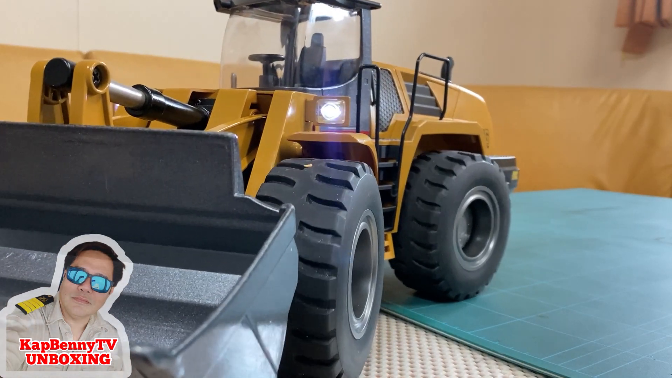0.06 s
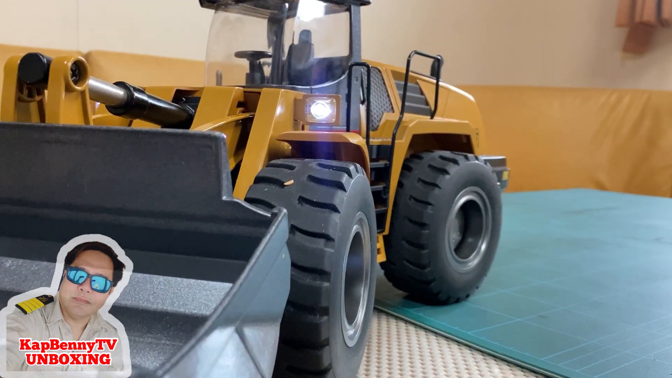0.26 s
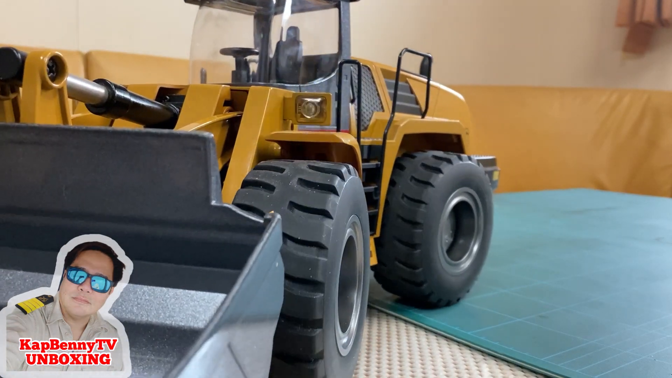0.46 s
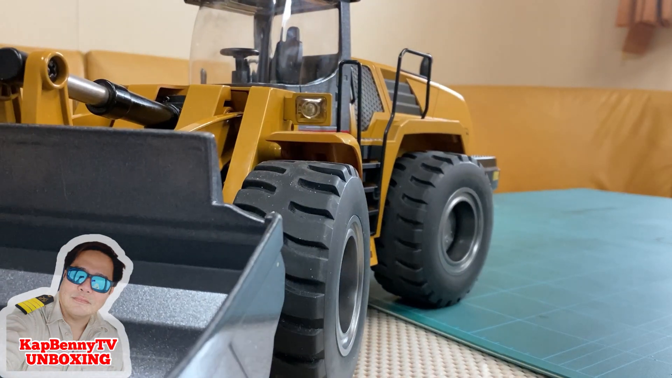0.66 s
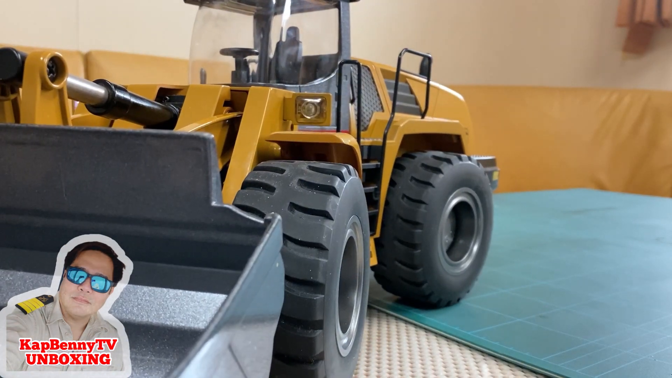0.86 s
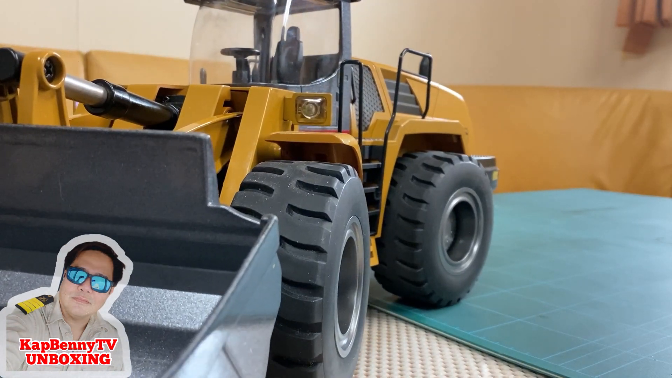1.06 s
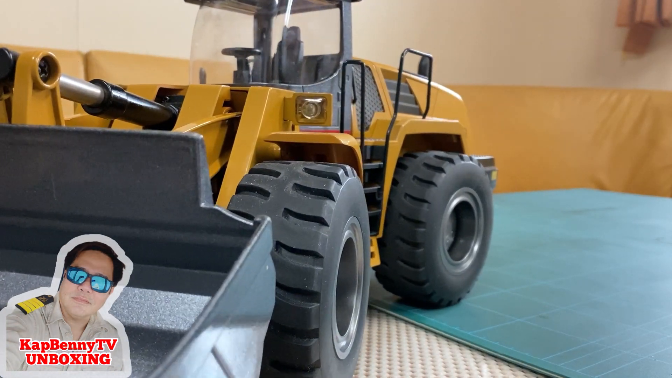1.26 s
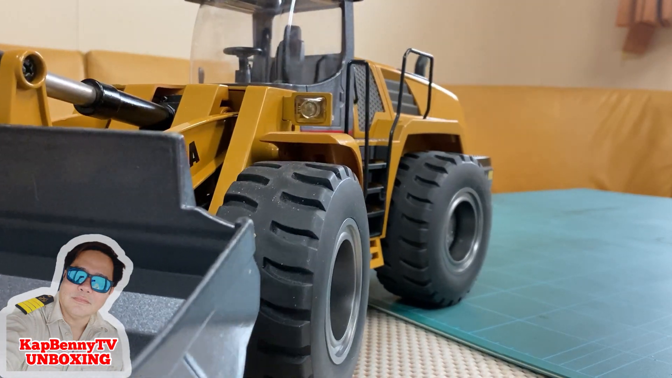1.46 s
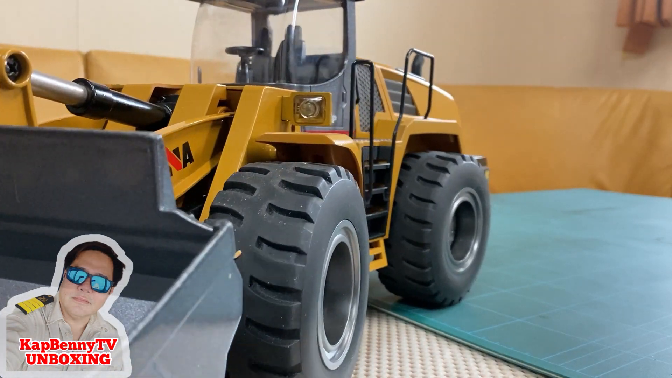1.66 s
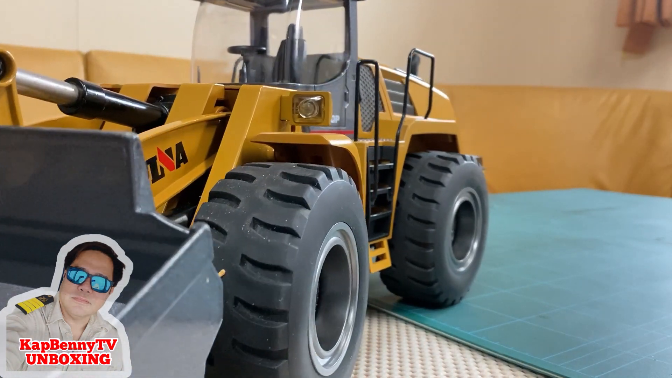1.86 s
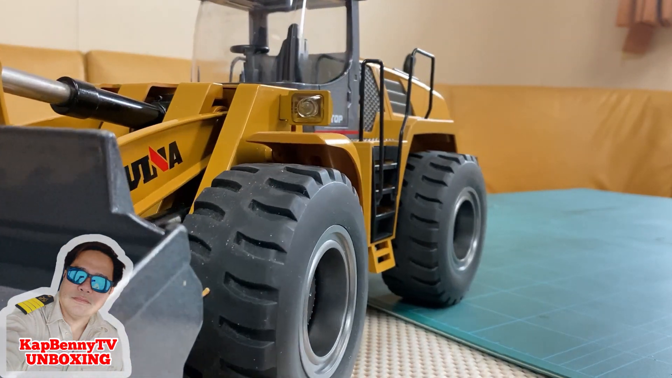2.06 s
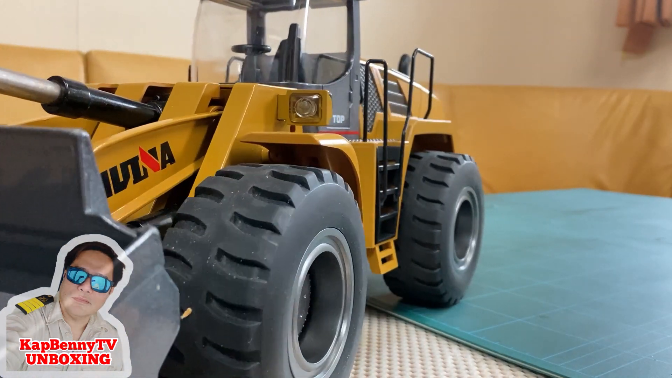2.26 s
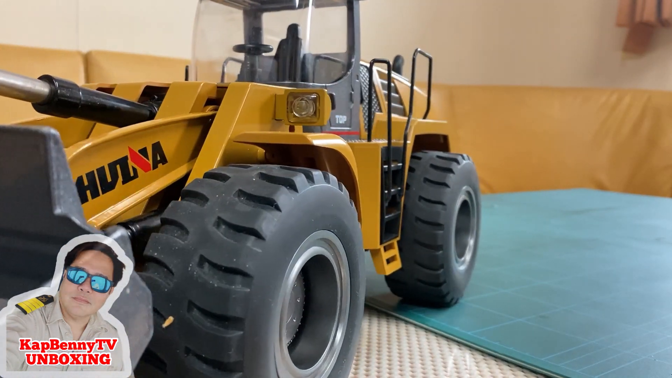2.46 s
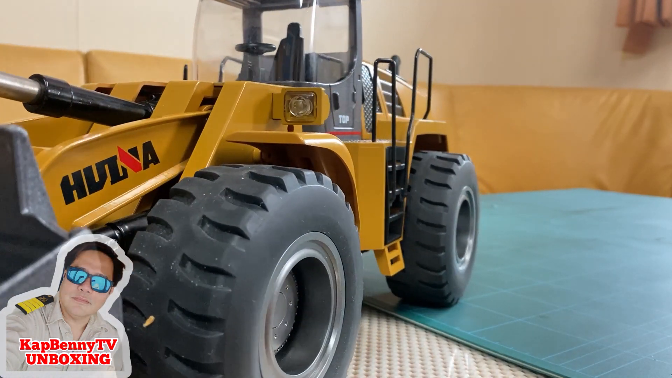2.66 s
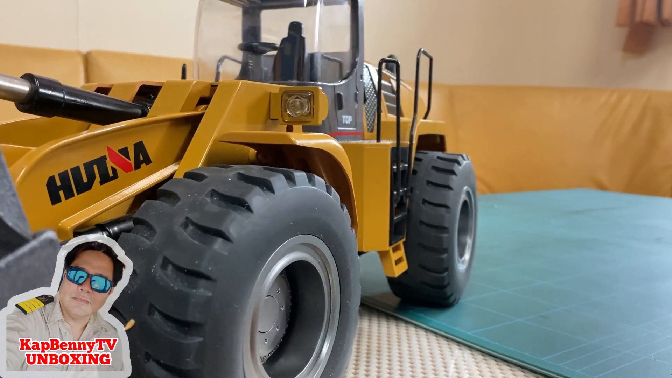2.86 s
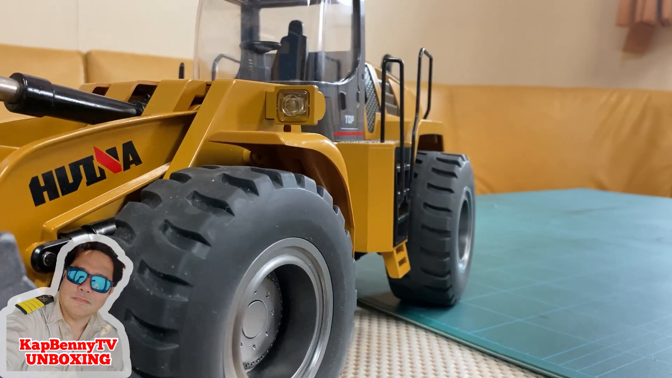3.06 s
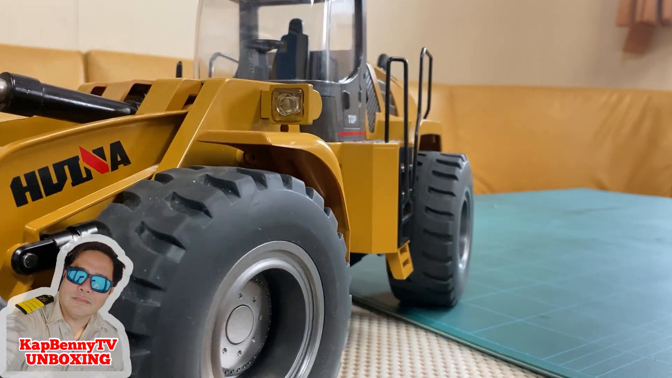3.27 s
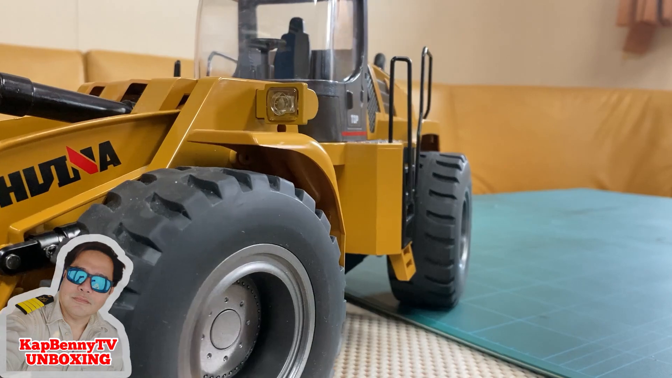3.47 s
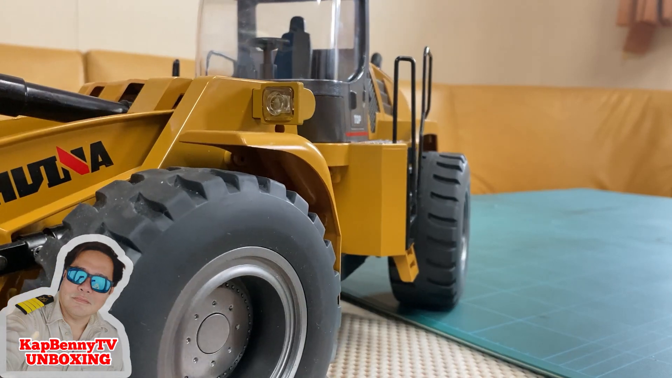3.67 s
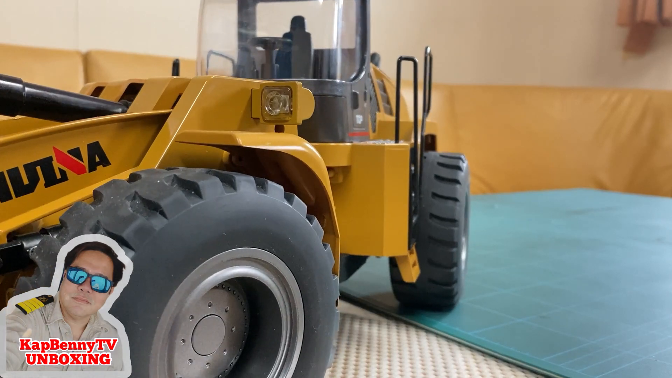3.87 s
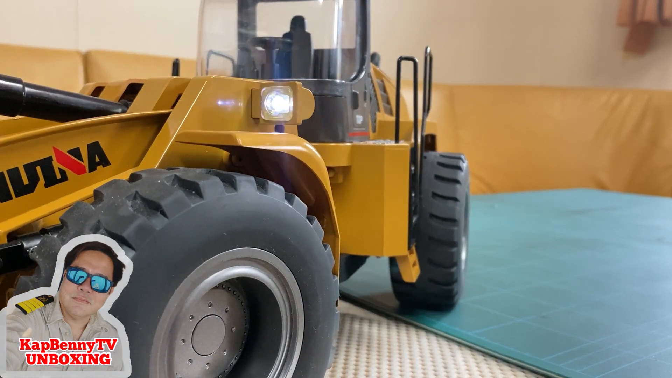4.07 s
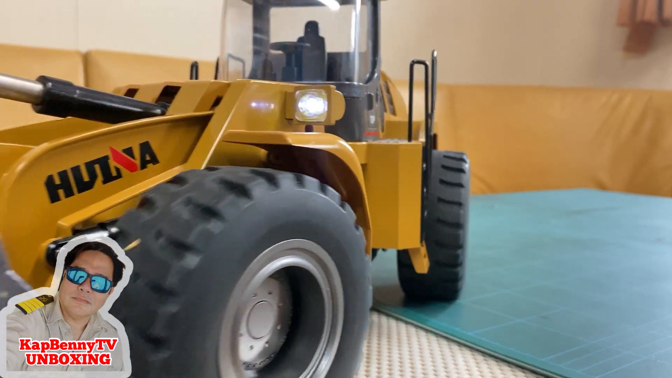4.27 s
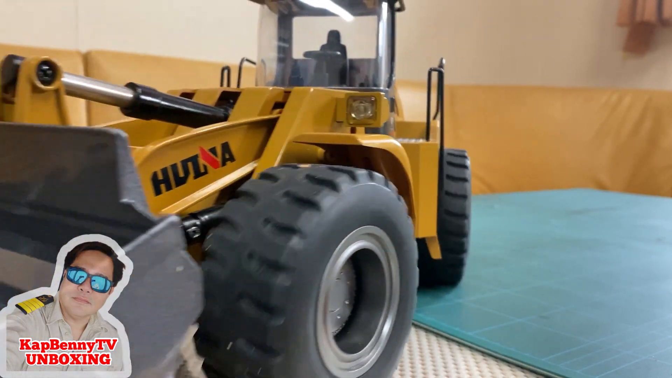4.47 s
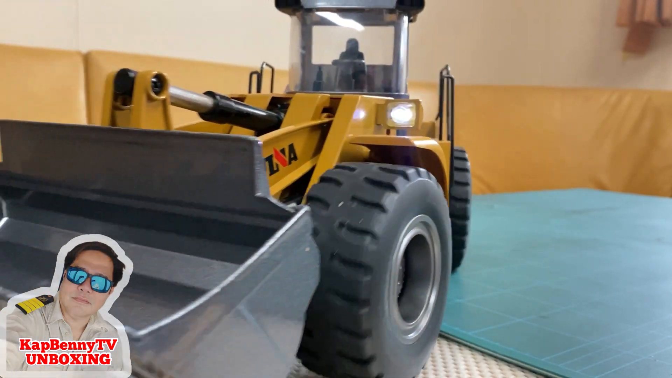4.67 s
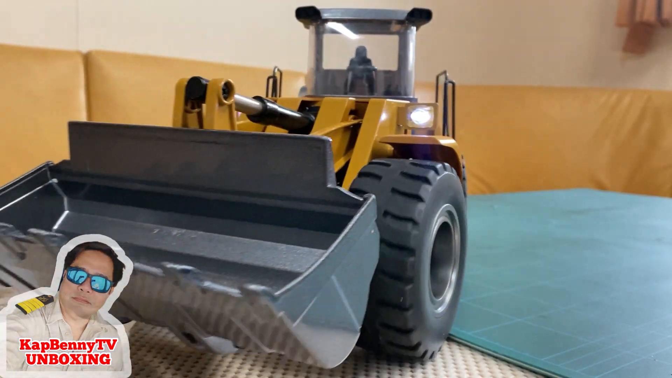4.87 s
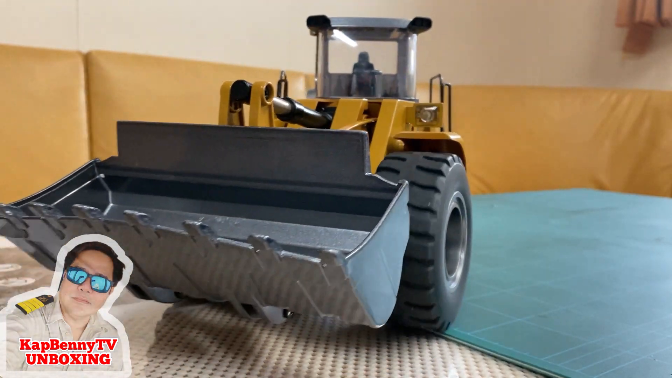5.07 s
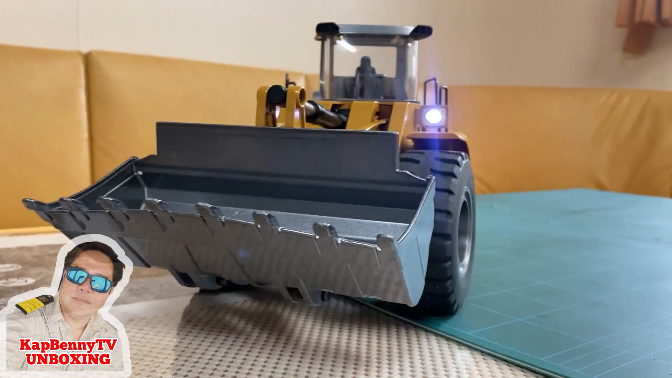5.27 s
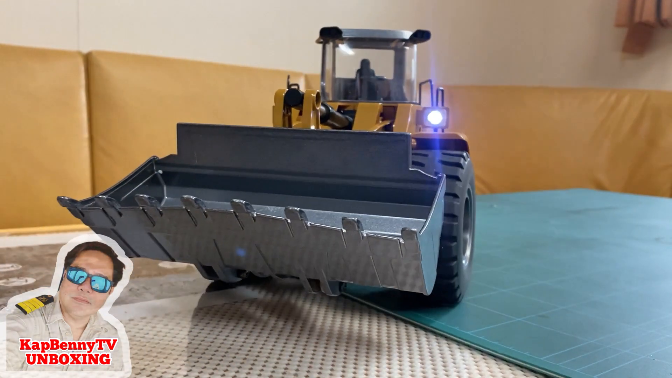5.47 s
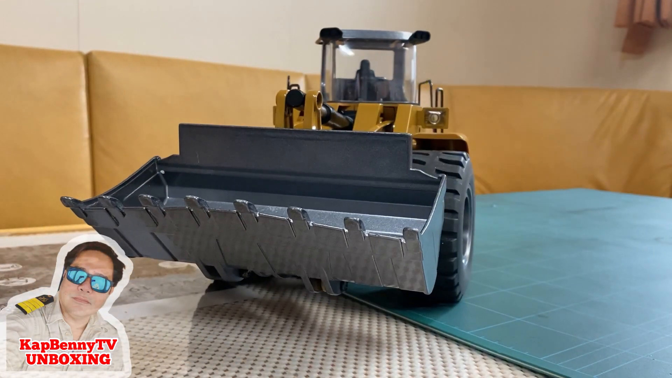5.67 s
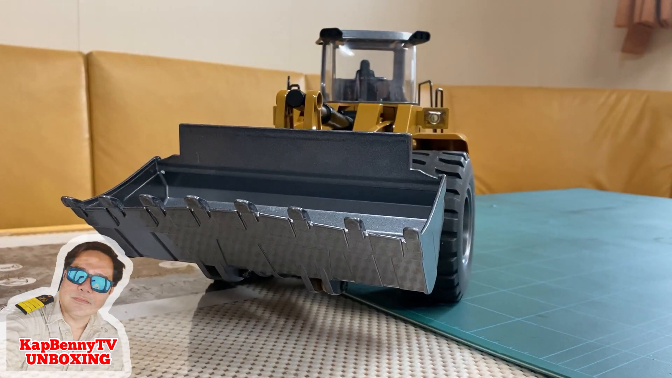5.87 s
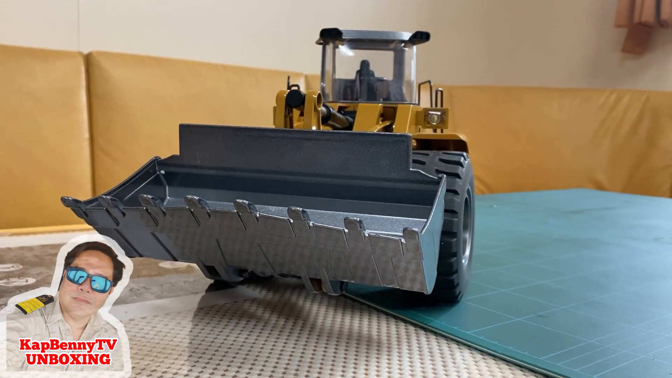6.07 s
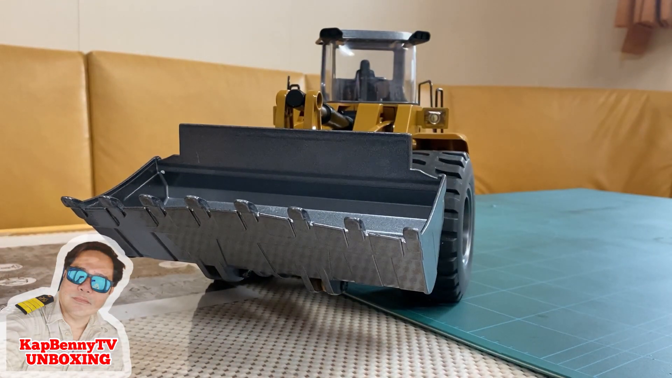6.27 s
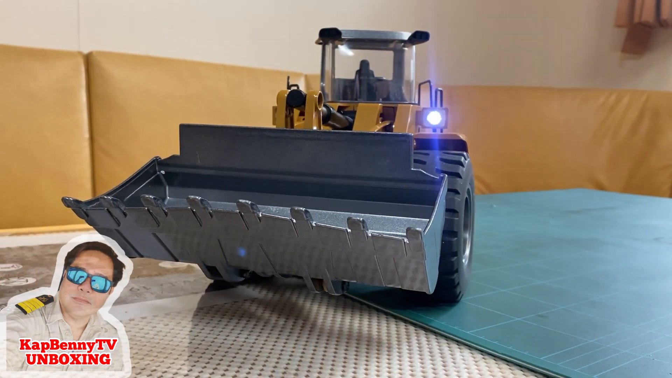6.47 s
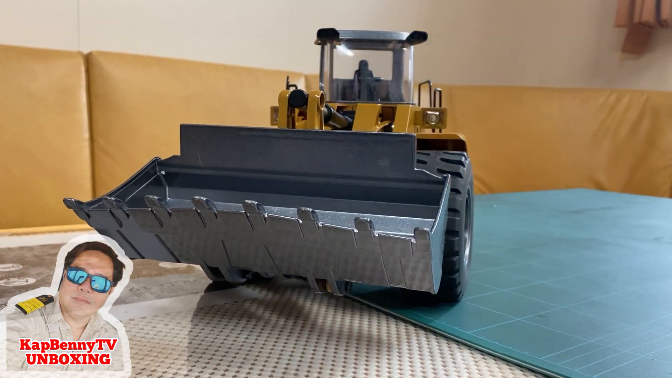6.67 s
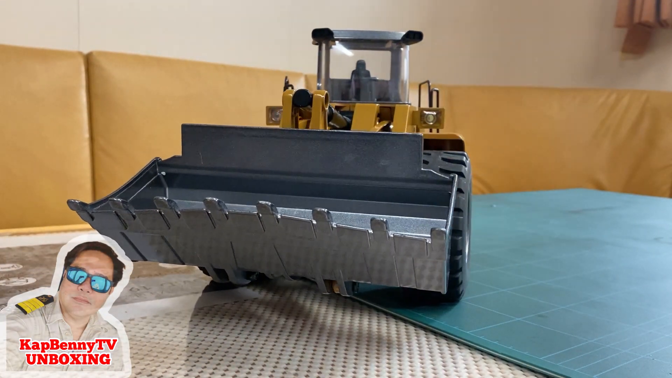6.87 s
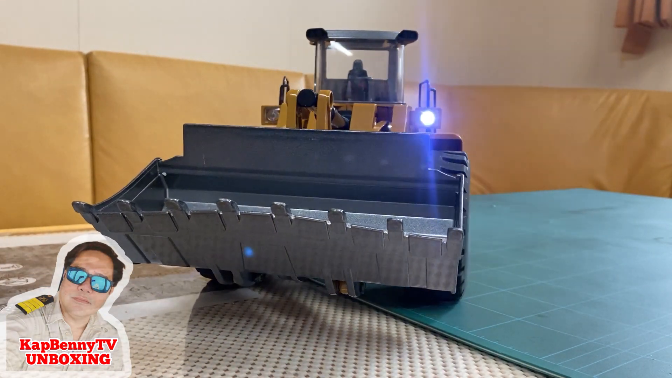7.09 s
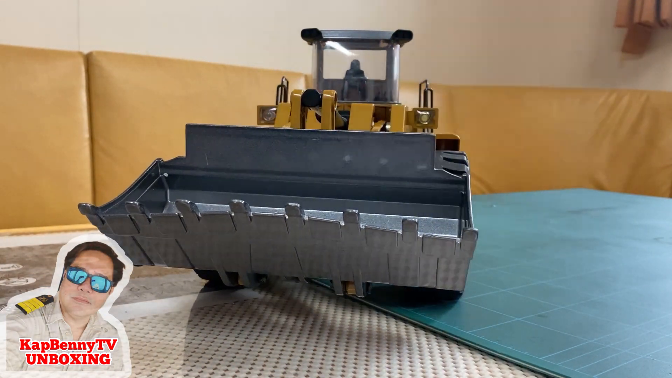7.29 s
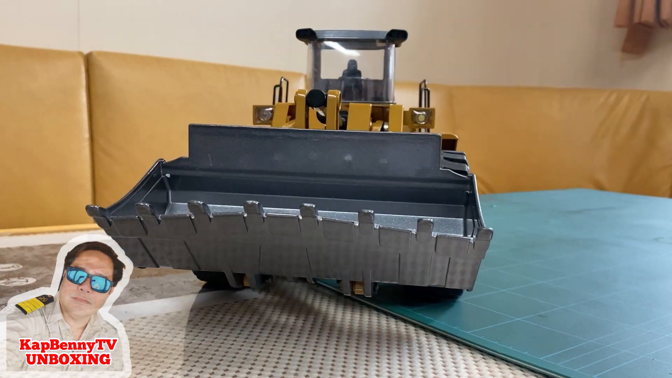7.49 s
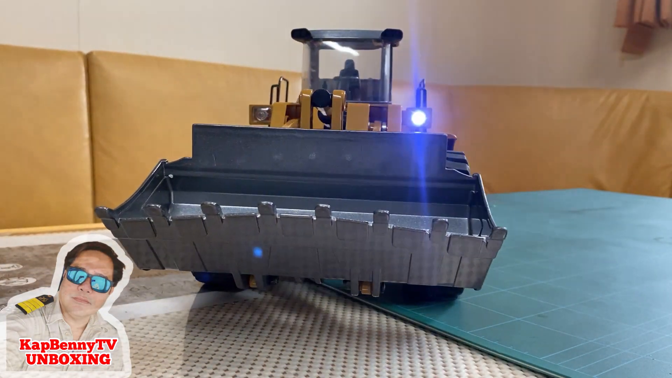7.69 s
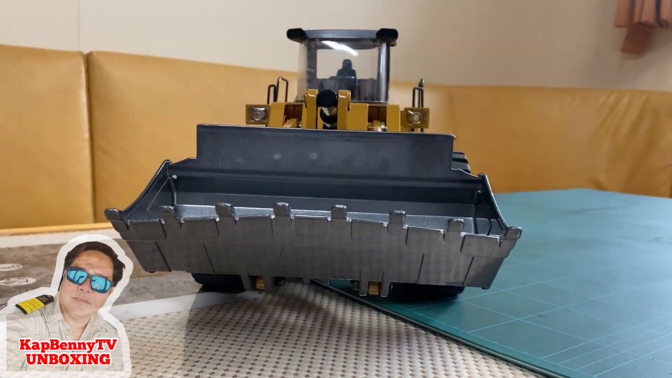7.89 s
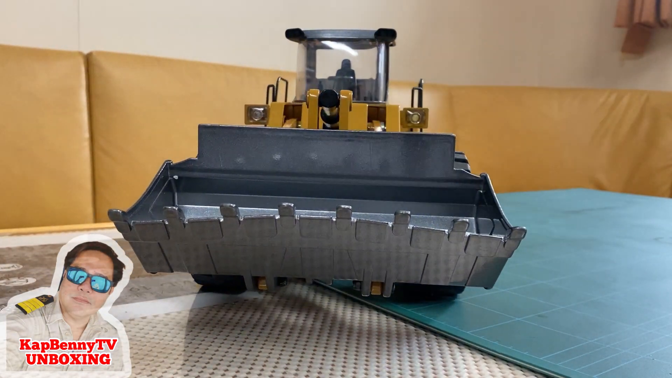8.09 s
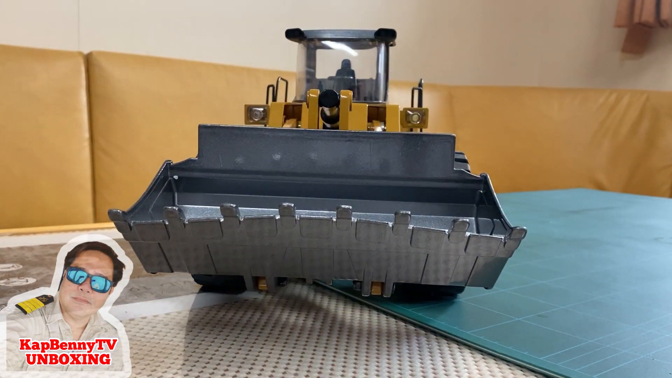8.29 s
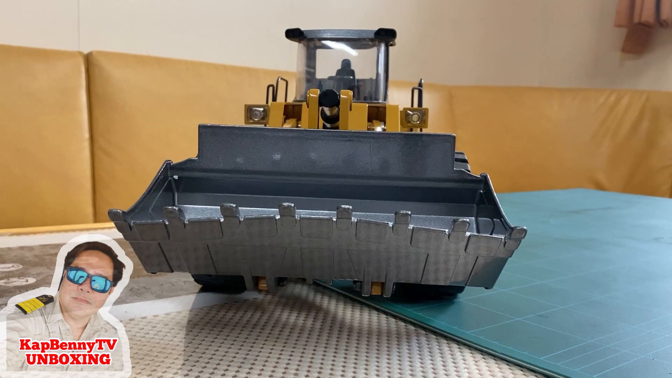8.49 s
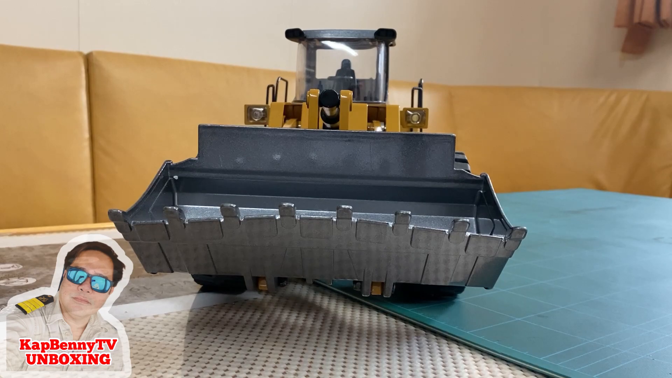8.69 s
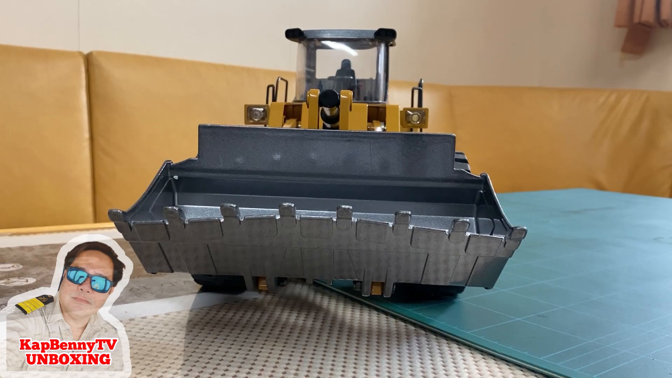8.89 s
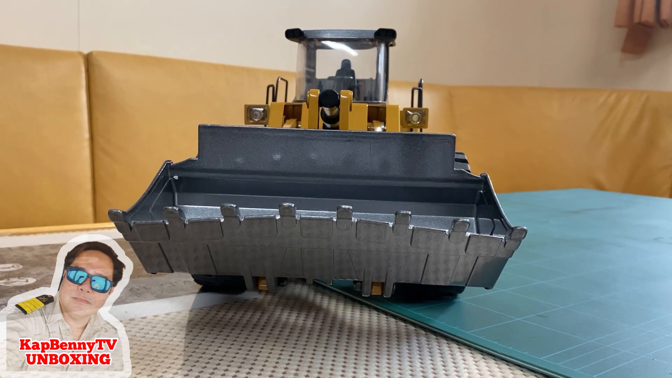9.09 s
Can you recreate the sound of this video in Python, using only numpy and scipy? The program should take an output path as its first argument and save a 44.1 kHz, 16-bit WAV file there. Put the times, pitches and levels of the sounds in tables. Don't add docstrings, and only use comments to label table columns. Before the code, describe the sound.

A low cooling fan throbs softly throughout, with dull rumble and faint air, in a small soft room. Close to a phone, a toy loader's plastic gearbox growls over a winding hum from 0 to 0.5 s and dies. At 0.8 s a faint tick and short electric buzz precede the steering motor: from 0.9 s it strains, jumps up in pitch, sags, then whines steadily with gritty gear noise and brush hiss, braking at 3.8 s. At 4.05 s the drive hums and growls again, harder and rougher, with a wavering mesh tone, until a small tick at 5.6 s. After a pause, a clearer tick and buzz at 6.3 s start a brighter, higher steering whine, which jumps up at 6.6 s, holds, slows and stops around 8 s. A last, loudest, deeper plastic knock at 8.05 s leaves only the low throb.

```python
import sys
import numpy as np
from scipy import signal
from scipy.fft import rfft, irfft, next_fast_len
from scipy.io import wavfile
from scipy.ndimage import uniform_filter1d

SR = 44100
rng = np.random.default_rng(int(sys.argv[2]) if len(sys.argv) > 2 else 0)


def attenuation_scalar(level_db):
    decades = np.asarray(level_db, float) / 20
    return 10 ** decades


def unload_audio(sound):
    columns = np.transpose(np.atleast_2d(sound))
    steps = np.round(np.clip(columns, -1, 1) * 32767)
    wavfile.write(sys.argv[1], SR, steps.astype(np.int16))


N = 403074

# (frequency [Hz], level [dB per Hz])
SPARKS_SPECTRUM = [(12100, -60), (12500, 6.5), (14200, 0), (15200, 9), (15600, -49)]


def unit(x):
    return x / np.sqrt(np.mean(x ** 2) + 1e-20)


def along(points, hz):
    f, v = np.transpose(points)
    return np.interp(np.log(hz + 1), np.log(f + 1), v)


def stretch(rows):
    s, *cols = np.transpose(rows)
    part = slice(max(round(s[0] * SR), 0), round(s[-1] * SR))
    t = np.arange(N)[part] / SR
    return part, [np.interp(t, s, c) for c in cols]


def held(t, start, stop, rise, fall):
    return -np.maximum(0, np.maximum((start - t) * rise, (t - stop) * fall))


def wobble(rate, size):
    knots = rng.standard_normal(size // 200 + 2)
    return np.interp(np.arange(size) * rate / SR, np.arange(len(knots)), knots)


def filtered(x, response):
    n = x.shape[-1]
    m = next_fast_len(n + 8192)
    return irfft(rfft(x, m) * response(np.fft.rfftfreq(m, 1 / SR)), m)[..., :n]


def rush(spectrum, size, patchy_db, gate=1, life=8, width=5):
    z = signal.stft(gate * rng.standard_normal((2, size)), nperseg=512)[2]
    field = uniform_filter1d(rng.standard_normal(z.shape[1:]), size=width, axis=0)
    field = uniform_filter1d(field, size=life, axis=1)
    pair = signal.istft(z * attenuation_scalar(patchy_db * unit(field)), nperseg=512)[1][:, :size]
    return unit(filtered(pair, lambda hz: attenuation_scalar(along(spectrum, hz))))


def stack(turns, orders, flutter_db, drift, lean=0):
    out, n = 0, len(turns)
    for k, db in orders:
        angle = 2 * np.pi * (k * turns + rng.uniform()) + drift * np.sqrt(k) * wobble(40, n)
        flutter = flutter_db * min(k / 10, 1.5) ** lean * wobble(24, n)
        out += attenuation_scalar(db + flutter) * np.sqrt(2) * np.sin(angle)
    return out


def drive():
    # (time [s], level [dB])
    runs = [
        [(0, -41), (.26, -39), (.44, -40), (.58, -87)],
        [(4.0, -87), (4.05, -51), (4.09, -41), (4.28, -31), (4.64, -30), (5.22, -32), (5.37, -35.5),
         (5.53, -43), (5.62, -74)],
    ]
    # (time [s], frequency [Hz], level [dB])
    whines = [
        [(4.28, 1120, -47), (4.42, 1248, -35), (4.52, 1220, -48), (4.6, 1207, -36.5), (4.72, 1165, -37),
         (4.95, 1190, -45), (5.07, 1092, -40.5), (5.2, 1087, -43), (5.27, 1085, -64)],
        [(5.29, 1350, -50), (5.38, 1368, -41.5), (5.52, 1348, -53)],
    ]
    # (frequency [Hz], level [dB per Hz])
    growl_spectrum = [(260, -60), (450, -30), (502, -35), (603, -13), (737, -16.5), (901, -3), (1020, -8),
                      (1180, -1.5), (1530, -3.5), (2230, -3), (2580, -8.5), (3680, -24.5), (4000, -26),
                      (5200, -67), (8800, -120)]
    # (frequency [Hz], level [dB per Hz])
    grit_spectrum = [(1760, -12.5), (3000, 2), (3770, -5), (5040, 1.5), (5480, -1.5), (8380, -10),
                     (9860, -10.5), (11400, -25.5), (14800, -77), (22000, -120)]
    out = np.zeros((3, N))
    for rows in runs:
        part, (growl_db,) = stretch(rows)
        n = len(growl_db)
        grit_db = np.maximum(-9 + 0.7 * (growl_db + 30.5), -13)
        chatter = attenuation_scalar(0.75 * wobble(180, n) + 0.71 * wobble(26.54, n))
        growl = rush(growl_spectrum, n, patchy_db=2.0, gate=chatter, life=16, width=2)
        grit = attenuation_scalar(-1.2) * rush(grit_spectrum, n, patchy_db=1.5, gate=chatter)
        grit += attenuation_scalar(-31.0) * rush(SPARKS_SPECTRUM, n, patchy_db=6.5, life=50, width=14)
        out[1:, part] = attenuation_scalar(growl_db - 1.3) * growl + attenuation_scalar(growl_db + grit_db) * grit
    for rows in whines:
        part, (hz, db) = stretch(rows)
        out[0, part] = stack(np.cumsum(hz) / SR, [(1, db)], flutter_db=2.0, drift=1.45)
    return out


def buzz():
    # (start [s], stop [s], level [dB])
    hum = [
        (0, .45, -52.5),
        (4.07, 4.29, -44),
        (4.29, 5.5, -52.5),
    ]
    # (multiple of the chopping rate, level [dB])
    hum_orders = [(3, -17), (5, 0), (6, -14), (7, -8), (10, -14), (11, -14), (12, -13)]
    # (start [s], stop [s], level [dB])
    steering = [
        (.82, .97, -49),
        (6.31, 6.5, -54.5),
    ]
    # (multiple of the chopping rate, level [dB])
    steering_orders = [(1, 0), (2, -17), (3, -7), (4, -15), (5, -2), (6, -9), (7, -15), (8, -11), (9, -14),
                       (10, -13), (11, -8), (12, -7), (13, -10), (14, -12), (15, -17)]
    chop_hz = 192.9
    out = np.zeros(N)
    for rows, orders, rise in ((steering, steering_orders[2:], 3000), (hum, hum_orders, 400)):
        for start, stop, db in rows:
            part, (t,) = stretch([(start - .1, start - .1), (stop + .2, stop + .2)])
            windings = unit(stack(t * chop_hz, orders, flutter_db=3.0, drift=0.12))
            out[part] += attenuation_scalar(db + held(t, start, stop, rise, fall=200)) * windings
    return out


def cooler():
    # (multiple of the turning rate, level [dB])
    fan_orders = [(6, -63), (8, -56), (9, -53.5), (10, -51), (11, -55), (12, -62), (13, -54.5), (14, -42.5),
                  (15, -53), (16, -52.5), (17, -75.5), (18, -59.5), (20, -52.5), (21, -63.5), (23, -68),
                  (24, -58), (30, -57.5)]
    # (frequency [Hz], level [dB per Hz])
    rumble_spectrum = [(12, -64), (20, -34), (38, -10), (86, 3.5), (99, -3), (113, -16.5), (183, -13),
                       (220, -18), (257, -19), (285, -27.5), (351, -24.5), (380, -38), (450, -44.5),
                       (580, -87), (990, -120)]
    # (frequency [Hz], level [dB per Hz])
    air_spectrum = [(240, 0), (400, -5.5), (539, -8.5), (604, -11), (677, -9), (863, -8), (1230, -7.5),
                    (1280, -6), (2140, -23.5), (4830, -23), (12000, -42.5), (15600, -95), (22000, -120)]
    turn_hz, thump_s = 6, 5.72
    turn = 2 * np.pi * turn_hz * (np.arange(N) / SR - thump_s)
    out = attenuation_scalar(-40.5) * rush(rumble_spectrum, N, patchy_db=-1.5)
    out += attenuation_scalar(-53.47) * rush(air_spectrum, N, patchy_db=1.5)
    for k, db in fan_orders:
        angle = k * turn + rng.normal(0, 0.71) + 0.43 * wobble(1.205, N)
        out[0] += attenuation_scalar(db) * np.sqrt(2) * np.cos(angle)
    return out


def knocks():
    # (time [s], peak level [dB], frequency [Hz])
    ticks = [
        (0.8179, -50, 2310),
        (5.625, -49, 2200),
        (6.305, -37.5, 2130),
        (8.051, -28.5, 1320),
    ]
    out, t = np.zeros(N), np.arange(2000) / SR
    for s, db, hz in ticks:
        tick = .07 * rng.standard_normal(len(t)) * attenuation_scalar(-60 * t / 0.0013)
        tick += np.sin(2 * np.pi * hz * t) * attenuation_scalar(-60 * t / 0.024)
        tick += 0.36 * np.sin(2 * np.pi * 2600 * t) * attenuation_scalar(-60 * t / 0.017)
        out[round(s * SR):][:len(t)] += attenuation_scalar(db - 5.5) * tick
    return out


def steer(rows, free, brake, cruise, brush_db, spark_db, orders, songs, slope, count):
    # (frequency [Hz], level [dB per Hz])
    gear_spectrum = [(260, -43), (450, -34), (601, -3), (708, -12), (954, -0.5), (1050, -9.5), (1400, 0.5),
                     (1820, -6), (2780, -5.5), (4500, -14), (5850, -52), (9900, -120)]
    # (frequency [Hz], level [dB per Hz])
    brush_spectrum = [(2060, -21.5), (3500, 0), (4070, -3), (5500, 1), (6230, -2), (7920, -1.5),
                      (8540, -10), (9680, -3.5), (10700, -5), (11600, -8), (15100, -63), (22000, -120)]
    s, last_hz, last_db = rows[-1]
    coast_hz, coast_db = last_hz - 24, last_db - 12
    end = [(s + .1, coast_hz, coast_db), (s + .1 + .07, coast_hz, coast_db - 28)]
    part, (hz, gear_db) = stretch(rows + end)
    t, n = np.arange(N)[part] / SR, len(hz)

    order = np.arange(1, count + 1)
    order_db = slope[0] + slope[1] * order + 1.5 * rng.standard_normal(count)
    for k, db in orders:
        order_db[k - 1] = db

    clearing_s = .16
    clearness = np.clip(np.minimum(t - free, brake + clearing_s - t) / clearing_s, .02, 1)
    clear = .74 * clearness

    hiss_db = brush_db + held(t, t[0] + 0.094, s - 0.067, rise=190, fall=55)
    hiss_db -= 7 * np.exp(-((t - free) / 0.044) ** 2)
    hiss = attenuation_scalar(gear_db + hiss_db)

    rest_db = gear_db - 16 + 10 * np.log10(clearness)
    singers = sorted({row[0] for row in songs})
    singing = []
    for k in singers:
        thin_db = .045 * np.maximum(900 - k * hz, 0)
        levels = [rest_db - thin_db]
        levels += [db + held(t, a, b, rise=350, fall=350) for j, a, b, db in songs if j == k]
        singing.append((k, np.max(levels, axis=0)))

    def shell(k):
        return (order_db[k - 1] + np.interp(k * hz / cruise, order, order_db)) / 2

    turns = np.cumsum(hz * (1 + 0.00207 * wobble(29.79, n))) / SR
    low_orders = [(k, shell(k)) for k in range(4, 20) if k not in singers]
    high_orders = [(k, shell(k)) for k in range(20, count)]
    low = unit(stack(turns, low_orders, flutter_db=3.5, drift=0.2))
    high = unit(stack(turns, high_orders, flutter_db=3.5, drift=0.04))

    beat = 1 + .5 * np.cos(2 * np.pi * turns)
    gears = attenuation_scalar(gear_db - 3.0) * rush(gear_spectrum, n, patchy_db=3.0, gate=beat)
    brushes = hiss * attenuation_scalar(2.87) * rush(brush_spectrum, n, patchy_db=2.2, gate=beat)
    sparks = hiss * attenuation_scalar(spark_db) * rush(SPARKS_SPECTRUM, n, patchy_db=6, life=110, width=14)

    sound = np.zeros((3, n))
    sound[0] = np.sqrt(clear) * (attenuation_scalar(gear_db - 4.0) * low + hiss * attenuation_scalar(1.5) * high)
    sound[0] += stack(turns, singing, flutter_db=3.3, drift=0.2, lean=1)
    sound[1:] = np.sqrt(1 - clear) * (gears + brushes) + clearness ** .3 * sparks
    valley_db = np.array([[4], [8], [8]])
    out = np.zeros((3, N))
    out[:, part] = filtered(sound, lambda f: attenuation_scalar(-valley_db * np.exp(-((f - 4100) / 450) ** 2)))
    return out


def steer_out():
    # (time [s], shaft speed [Hz], effort [dB])
    run = [
        (0.92, 162, -54),
        (0.96, 166, -40.5),
        (1.08, 165.7, -40.5),
        (1.2, 204.4, -41.5),
        (1.26, 212, -39.5),
        (1.45, 186.4, -41.5),
        (1.62, 183.8, -42),
        (1.7, 187.1, -41),
        (1.84, 198.3, -42.5),
           (2.24, 198.6, -41.5),
        (2.33, 205.5, -40.5),
        (2.43, 209.5, -41),
        (2.8, 202.3, -42),
        (3.1, 206.2, -41),
        (3.17, 203.1, -42),
        (3.6, 201.3, -41),
        (3.69, 195, -41.5),
        (3.76, 178, -37),
    ]
    # (multiple of shaft speed, level [dB])
    orders = [(5, -21), (6, -11), (7, 0), (9, -10), (14, -8), (18, -24), (19, -27), (24, -13), (12, -11),
              (37, -15), (39, -18), (11, -13), (47, -20), (49, -15)]
    # (multiple of shaft speed, start [s], stop [s], level [dB])
    songs = [(9, 1.03, 1.16, -46.5), (17, 1.1, 1.17, -48.5), (16, 1.19, 1.27, -49.5),
             (3, 1.217, 1.35, -47.5), (13, 1.21, 1.305, -48.5), (7, 1.29, 1.42, -47), (8, 1.39, 1.8, -48.5),
             (9, 1.42, 1.72, -51.5), (16, 1.6, 2.1, -53), (4, 1.82, 3.7, -57), (7, 1.85, 2.28, -46.5),
             (17, 1.84, 2.3, -48.5), (14, 1.8, 3.68, -49.5), (3, 1.79, 2.26, -57), (3, 2.3, 3.6, -54.5),
             (7, 2.3, 2.56, -40.5), (9, 2.31, 2.41, -46.5), (7, 2.71, 3.13, -40), (7, 3.17, 3.66, -42.5),
             (9, 2.81, 2.92, -48), (9, 3.02, 3.15, -48), (9, 3.42, 3.76, -47.5), (16, 3.69, 3.76, -49),
             (7, 3.75, 3.78, -41), (8, 3.76, 3.79, -41.5)]
    return steer(run, free=1.1, brake=3.65, cruise=203, brush_db=-4.5, spark_db=-12.5,
                 orders=orders, songs=songs, slope=(-14, -.28), count=51)


def steer_back():
    # (time [s], shaft speed [Hz], effort [dB])
    turn_back = [
        (6.31, 190.5, -59),
        (6.42, 189.5, -46),
        (6.53, 186, -42),
        (6.612, 223.8, -41.5),
        (6.69, 230.5, -37),
        (6.9, 225.4, -37),
        (7.4, 225, -36.5),
        (7.79, 215.7, -38),
        (7.95, 202.8, -37.5),
    ]
    # (multiple of shaft speed, level [dB])
    orders = [(3, -2), (6, -8), (8, -14), (9, 0), (13, -1), (17, -4), (18, -16), (24, -3), (26, -7),
              (30, -5), (32, -7), (34, -7), (35, 0), (19, -6)]
    # (multiple of shaft speed, start [s], stop [s], level [dB])
    songs = [(3, 6.54, 6.59, -47.5), (4, 6.57, 6.73, -46.5), (3, 6.64, 6.75, -46.5), (13, 6.64, 6.82, -37),
             (9, 6.64, 7.82, -46), (17, 6.64, 7.84, -45), (3, 6.82, 7.93, -46.5), (13, 6.86, 7.55, -45),
             (4, 6.8, 7.85, -51), (10, 7.52, 7.88, -47.5), (13, 7.6, 7.86, -41.5), (10, 7.92, 7.94, -41.5)]
    return steer(turn_back, free=6.52, brake=7.8, cruise=224.5, brush_db=-2.8, spark_db=-23,
                 orders=orders, songs=songs, slope=(-7, -.19), count=41)


def room(x):
    # (frequency [Hz], time to fall 60 dB [s])
    decay = [(300, 0.12), (2000, 0.7), (10000, 0.12)]
    hz, t, z = signal.stft(rng.standard_normal((2, SR // 3)), SR, nperseg=256)
    tail = signal.istft(z * attenuation_scalar(-60 * t / along(decay, hz)[:, None]), SR, nperseg=256)[1]
    return signal.fftconvolve(x, tail / np.linalg.norm(tail[0]), axes=1)[:, :N]


def ports(pair, alike):
    # (frequency [Hz], left over right [dB])
    balance = [(300, -0.44), (600, 6), (1300, 2.5), (2400, 1), (5000, 6), (7000, 5.5), (8200, 2.5),
               (9500, -0.5)]
    # (frequency [Hz], phase by which left leads [rad])
    lead = [(200, 0), (1000, 1.05), (2600, 1.71), (5000, 2.5), (7000, 1.2), (8600, 2.1), (9600, -1),
            (10200, 1), (11800, 2.5), (12200, 4.5)]

    def response(hz):
        c = np.clip(along(alike, hz), 0, 1)
        u = np.arccos(c) / 2
        g, lag = attenuation_scalar(along(balance, hz) / 2), along(lead, hz)
        side = np.array([1, -1])[:, None, None]
        level = 2 / np.sqrt(g * g + 1 / g ** 2 + 2 * c * np.cos(lag) + 0.28)
        mix = np.array([[np.cos(u), np.sin(u)], [np.cos(u), -np.sin(u)]])[:, :len(pair)]
        return level * g ** side * np.exp(.5j * side * lag) * mix
    return filtered(pair, response).sum(axis=1)


def scene():
    # (frequency [Hz], likeness [0-1])
    near_alike = [(100, 0.95), (400, 0.6), (1500, 0.05), (4000, 0), (7500, .3), (9200, 0.3), (10200, 0.5),
                  (11500, 1), (12300, 1)]
    # (frequency [Hz], likeness [0-1])
    far_alike = [(100, 0.95), (350, 0.62), (550, 0.033), (8000, .15), (10200, .9), (12000, 0.53)]
    loader = drive() + steer_out() + steer_back()
    tones = loader[:1] + buzz() + knocks()
    near = ports(tones, [(100, 1)]) + ports(loader[1:], near_alike)
    return near + attenuation_scalar(-16) * room(near) + ports(cooler(), far_alike)


def band_limit(x):
    return signal.sosfilt(signal.butter(12, 15500, fs=SR, output="sos"), x)


def record(dry):
    heard = filtered(dry, lambda hz: 1 - np.exp(-((hz - 12020) / 290) ** 6))
    return band_limit(heard)


dry = scene()
out = record(dry)
unload_audio(out)
```